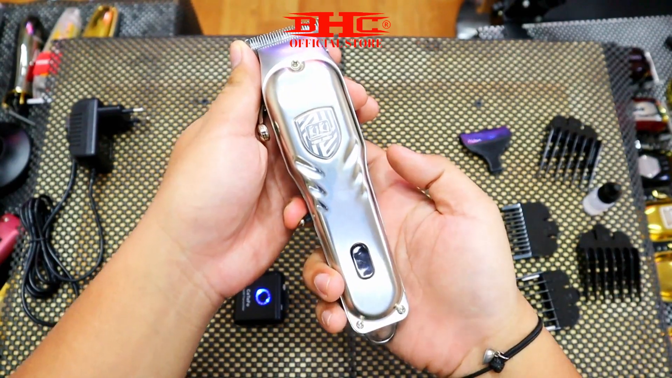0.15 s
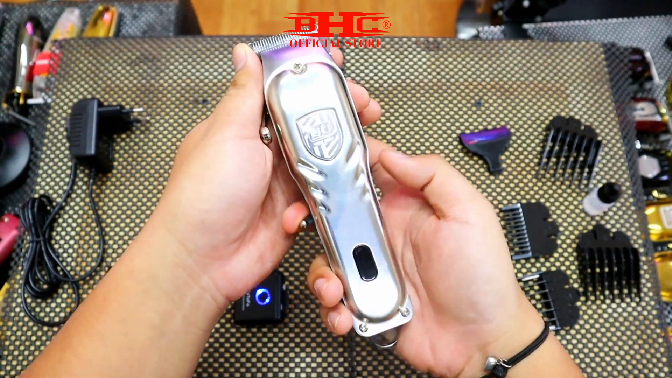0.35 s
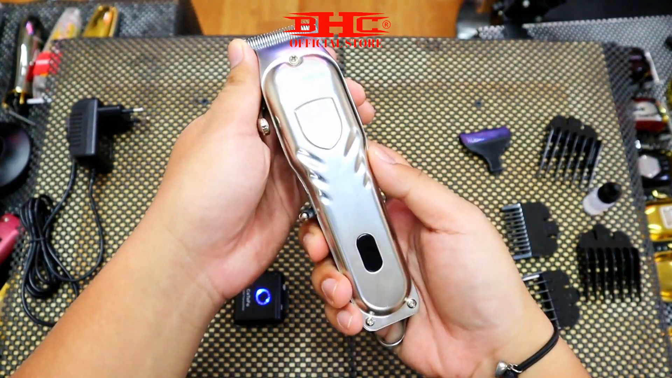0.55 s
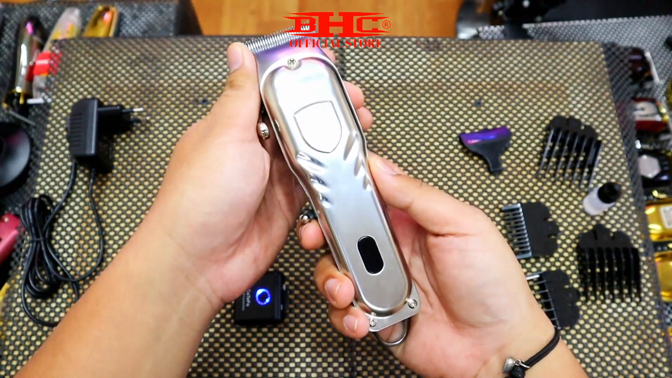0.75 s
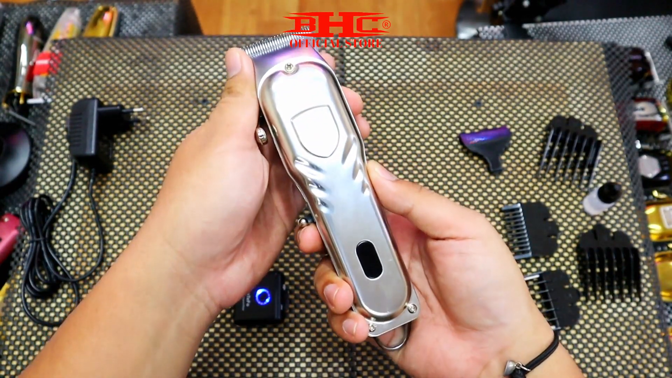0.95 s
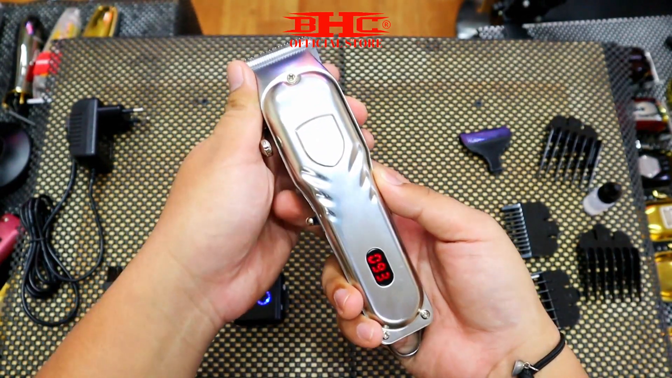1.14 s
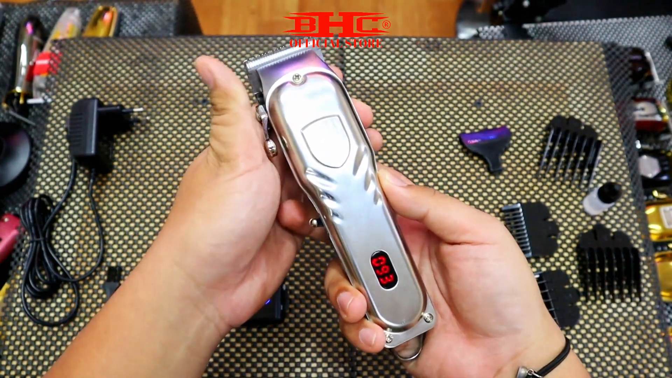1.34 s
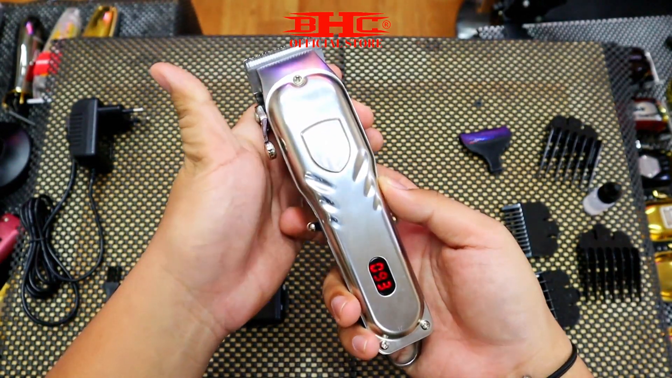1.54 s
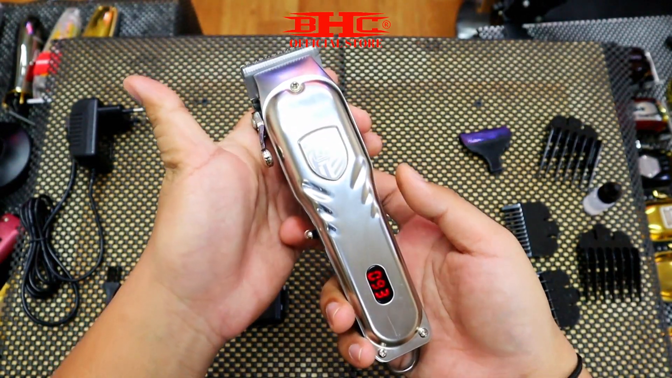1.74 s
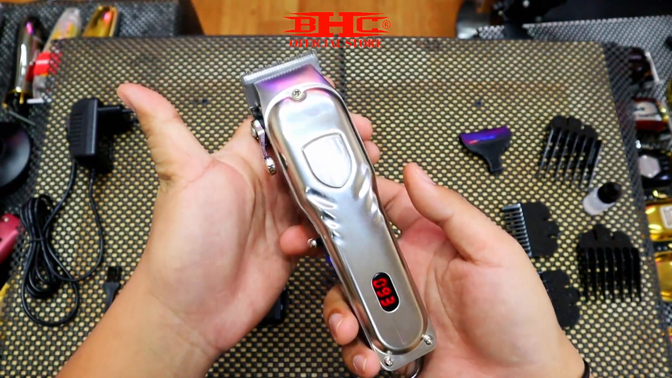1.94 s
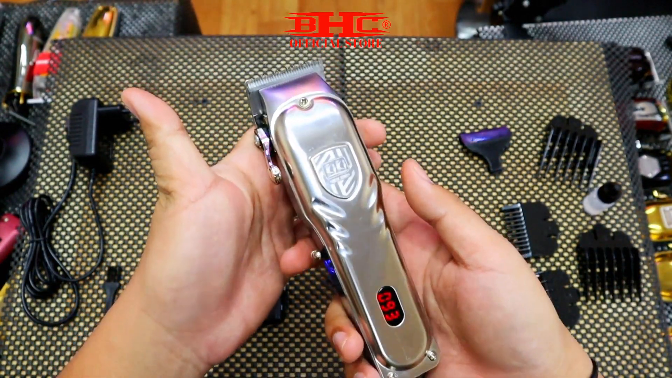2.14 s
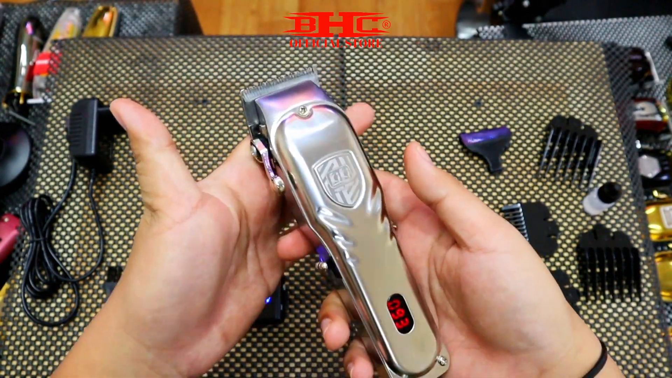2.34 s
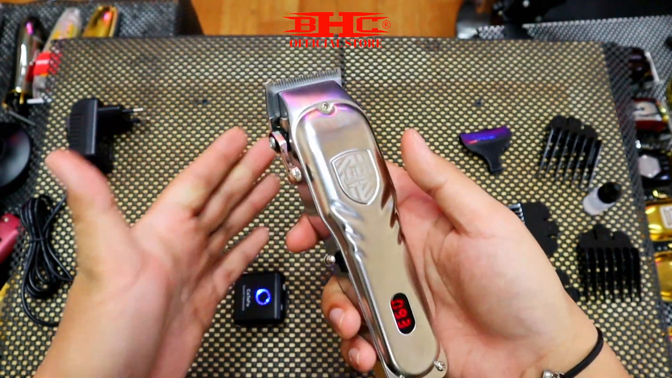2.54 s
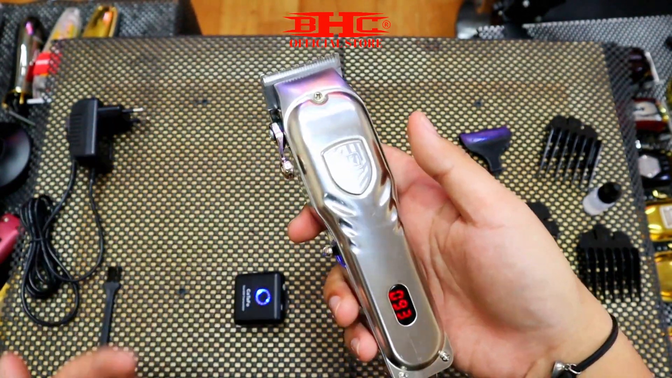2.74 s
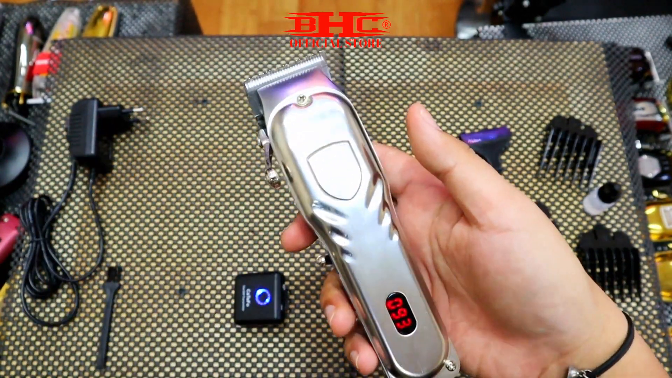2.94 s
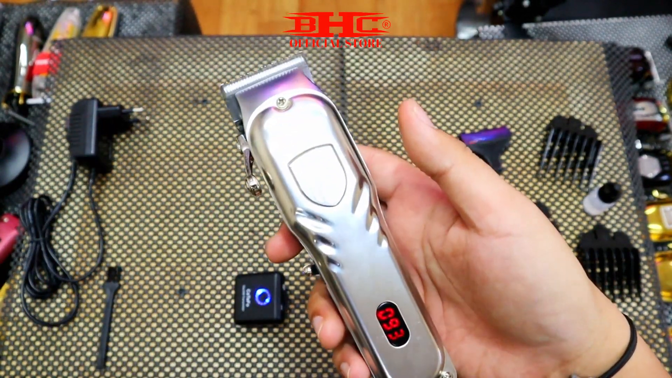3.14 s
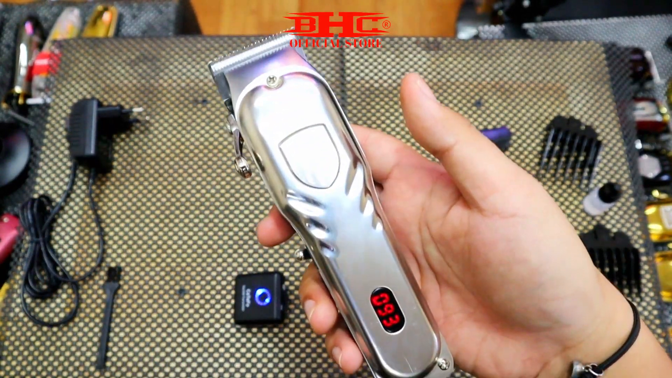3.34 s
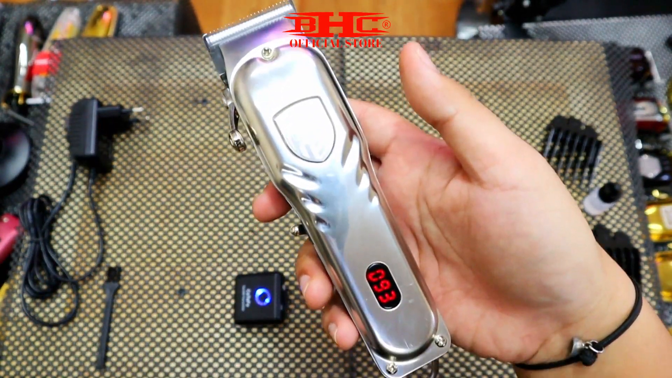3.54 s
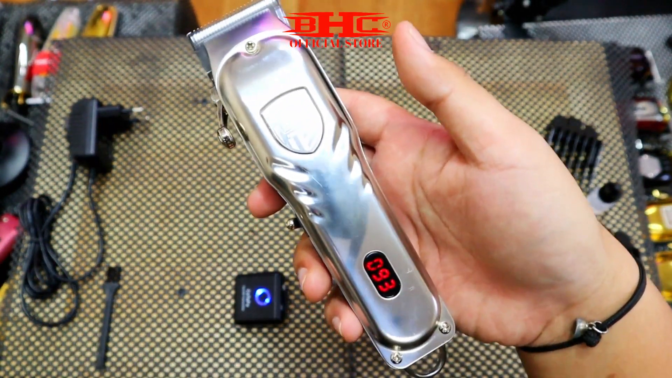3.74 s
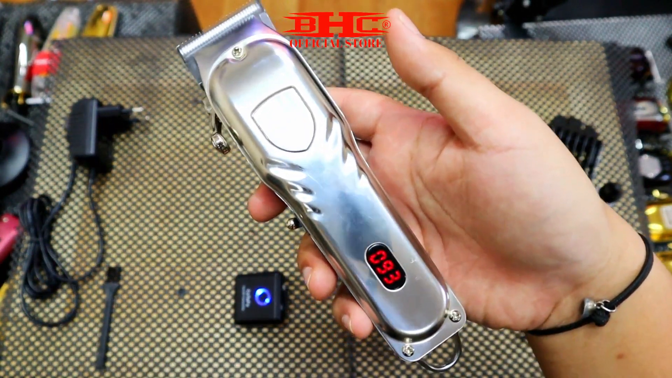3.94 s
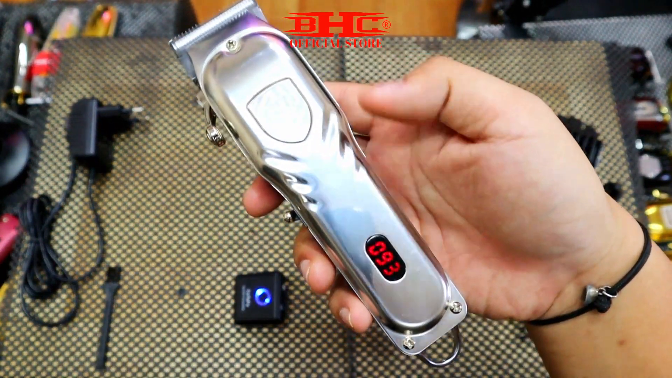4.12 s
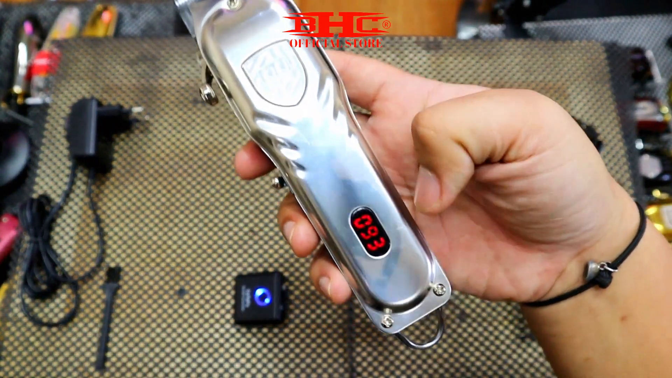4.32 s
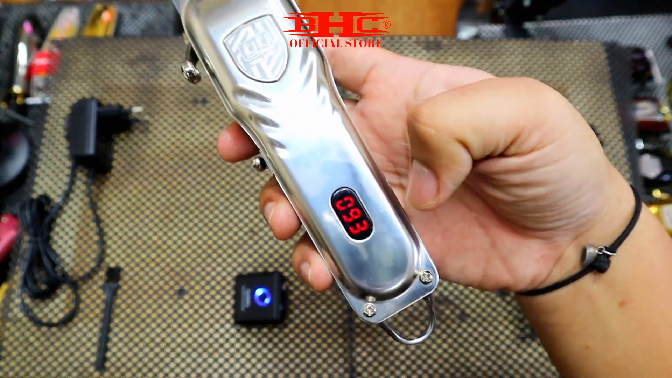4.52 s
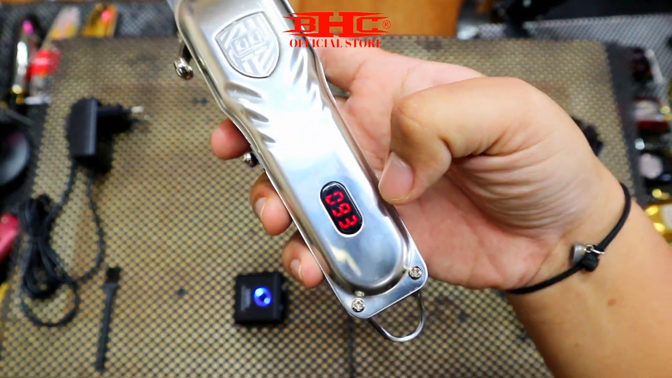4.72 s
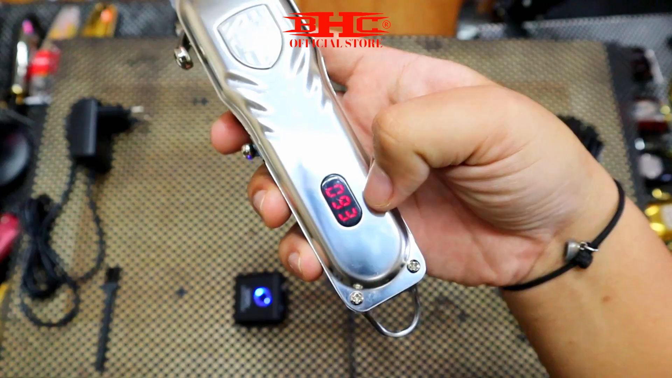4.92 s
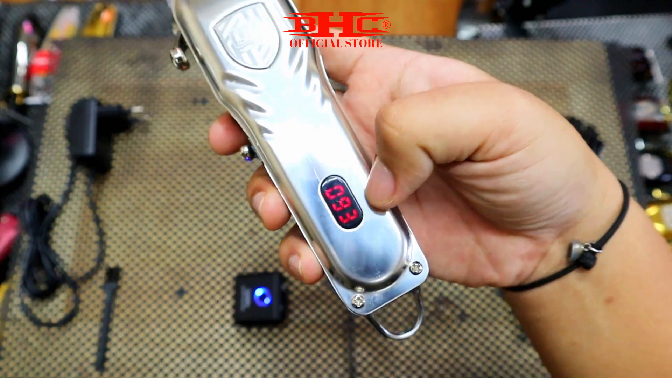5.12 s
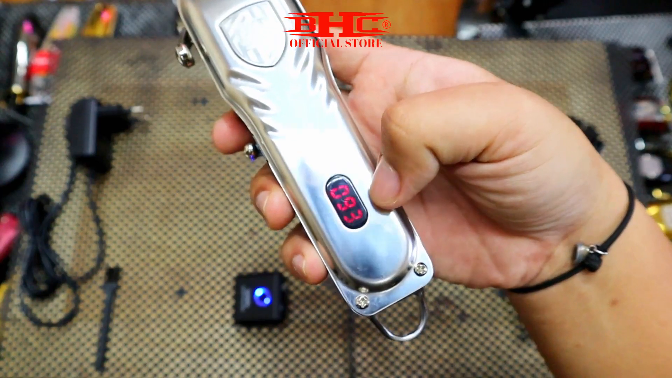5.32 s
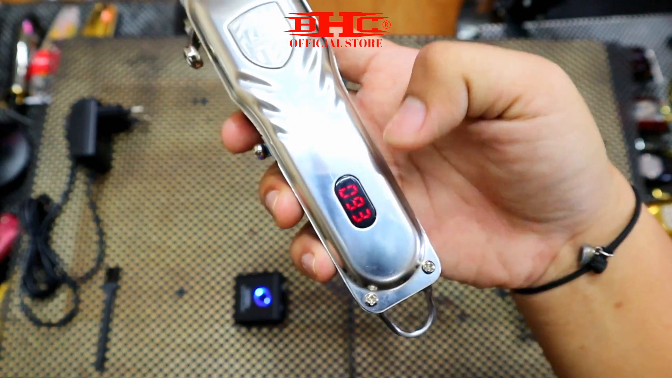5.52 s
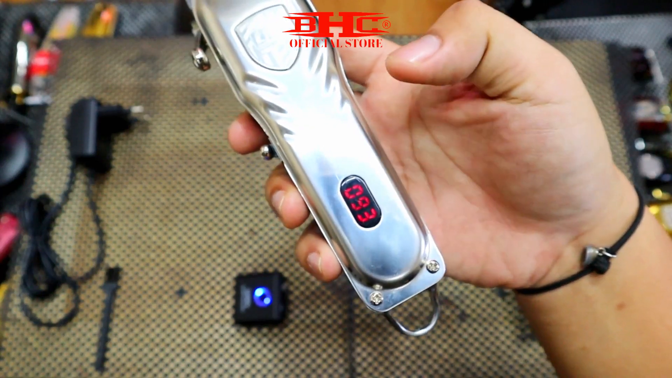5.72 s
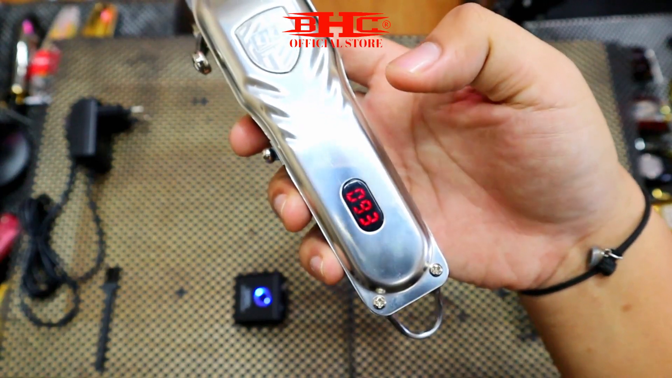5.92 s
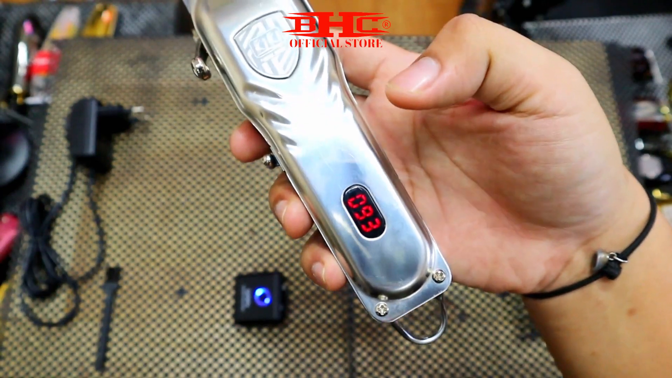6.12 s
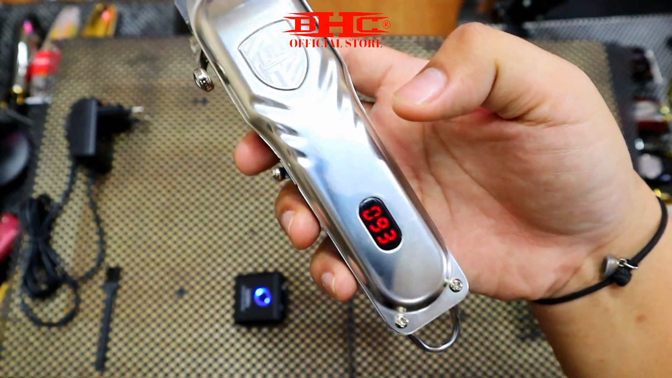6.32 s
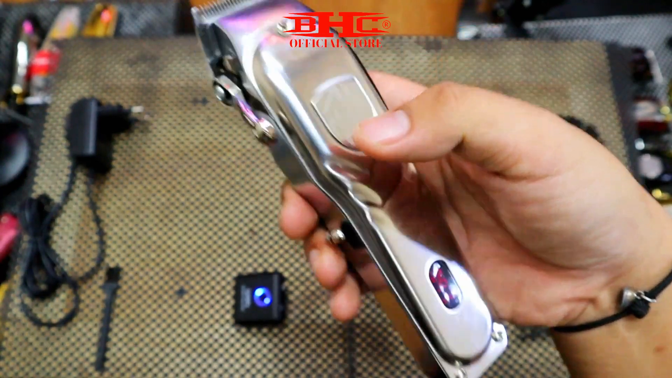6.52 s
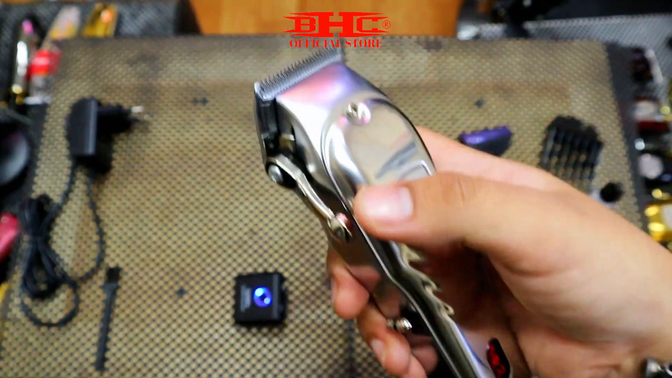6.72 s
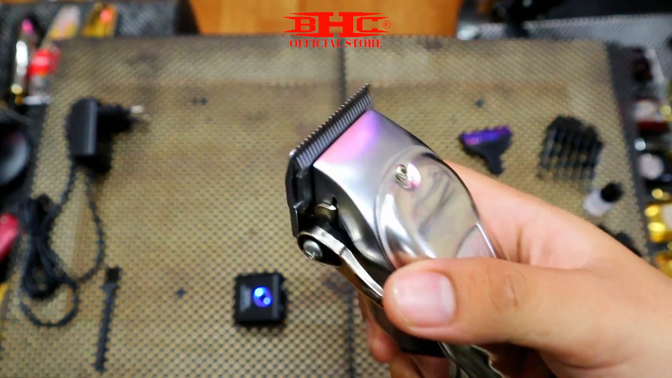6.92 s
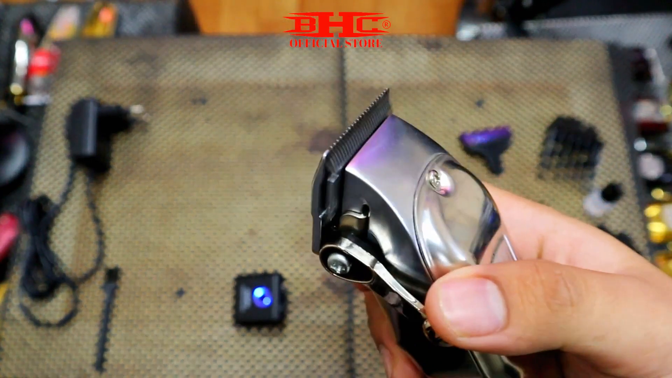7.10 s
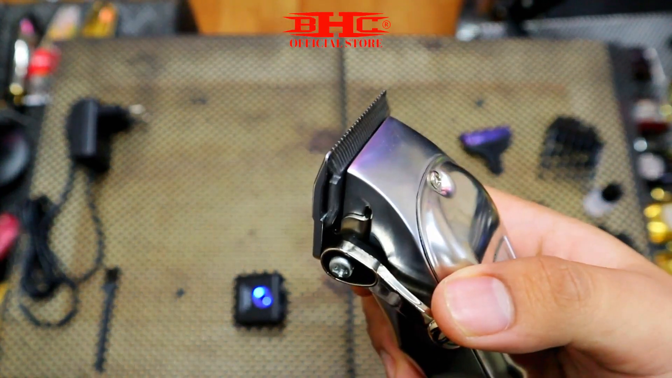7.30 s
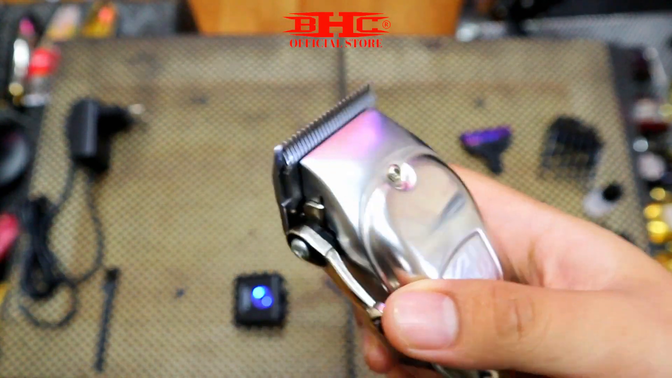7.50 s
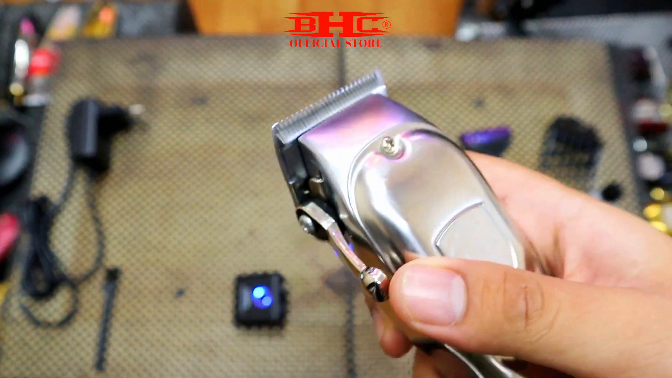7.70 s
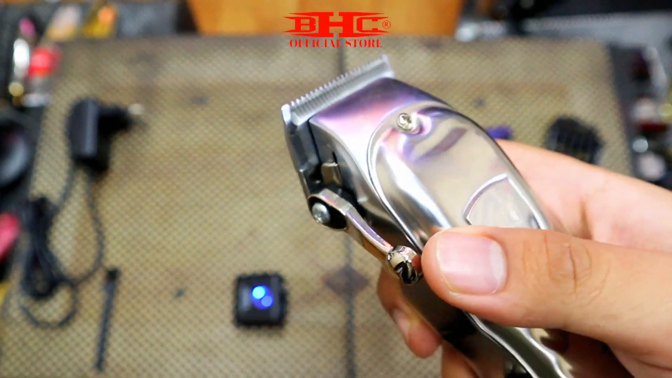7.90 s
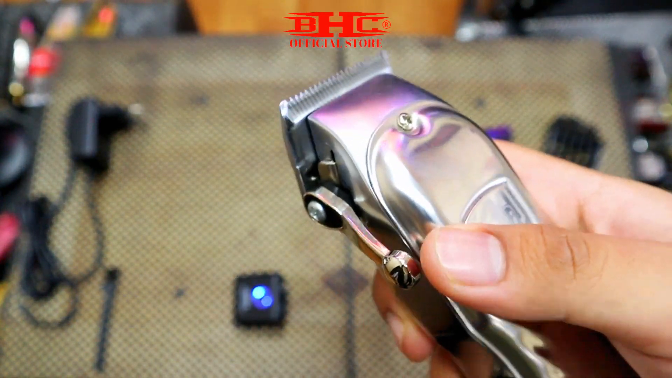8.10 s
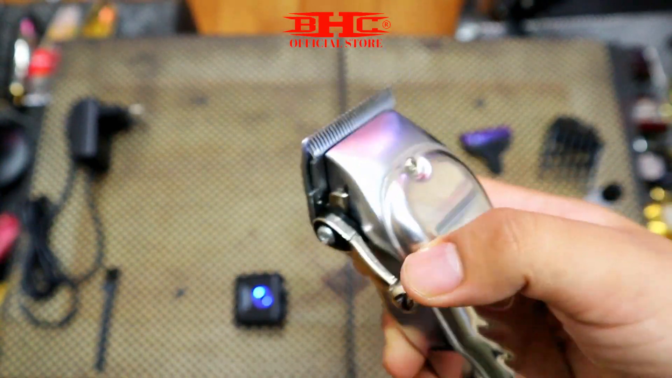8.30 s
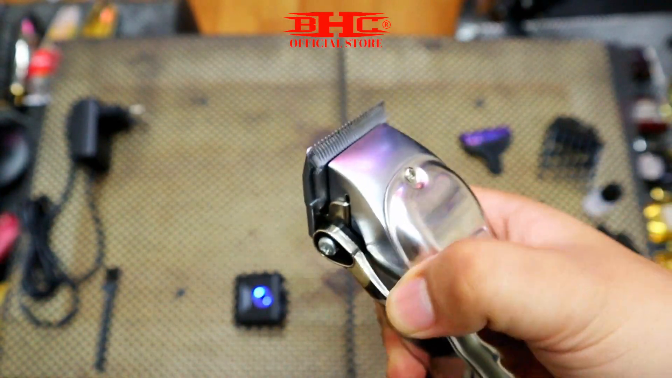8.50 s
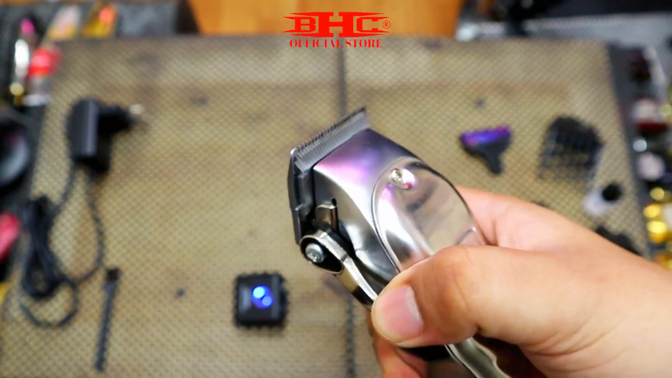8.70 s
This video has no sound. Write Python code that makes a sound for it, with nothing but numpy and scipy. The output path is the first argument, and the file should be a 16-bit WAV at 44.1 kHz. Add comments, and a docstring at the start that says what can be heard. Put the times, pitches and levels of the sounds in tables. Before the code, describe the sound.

A loud sharp switch snap, then a small metal clipper motor spins up and buzzes steadily close by, over faint traffic rumble.

```python
"""Hair clipper turned in the hand

A metal hair clipper is held close to a microphone above a bench, switched on and turned in the hand.
Each motor turn knocks the blade out and back; the knocks ring shell and blades, and each way of holding
it aims other modes at the microphone. Filtered noise and gliding tones make traffic outside a small room;
dull thuds are low modes struck once, and near the end a lever rattles and snaps as struck spring modes."""
import sys
import numpy as np
from scipy import signal
from scipy.fft import rfft, irfft
from scipy.io import wavfile
from scipy.ndimage import uniform_filter1d, map_coordinates

SR = 44100
rng = np.random.default_rng(int(sys.argv[2]) if len(sys.argv) > 2 else 0)


def transcribe(signal):
    """Save signal, clipped to [-1, 1], as a 16-bit WAV file at the path in sys.argv[1]."""
    frames = np.atleast_2d(signal).T
    limited = np.clip(frames, -1, 1)
    pcm = np.round(limited * 32767).astype(np.int16)
    wavfile.write(sys.argv[1], SR, pcm)


N = 385875
STEP = 64  # samples between updates of slow controls

# how it is held: (t/s, hold: 0 upright, 1 laid back, 2 raised, 3 blade forward, 4 rolled over, 5 thumb on lever)
HOLD_PATH = [(2.2, 0.), (2.65, 1.), (4.2, 1.), (4.55, 2.), (6.55, 2.), (6.8, 3.), (7.66, 3.), (7.8, 4.),
             (8.22, 4.), (8.32, 5.)]
# knocks in one turn: (share of the turn, relative level/dB into belly, grip, head, low and high blade modes)
TURN_KNOCKS = [(.17, -14, -4, -22, -9, 0), (.27, 0, 0, 0, 0, -8), (.48, -12, -8, -4, -10, -20),
               (.65, -14, -5, -20, -8, -9), (.77, -14, -9, -16, -7, -9), (.9, -1, -3, -24, -12, -16)]
# the loaded lever rattles on the shell: (t/s, level/dB)
LEVER_RATTLES = [(8.590, -37), (8.6025, -34), (8.6155, -32), (8.628, -31), (8.6432, -28)]
# running speed of the motor: (t/s, f/Hz in turns per second)
RUNNING_SPEED = [(3.0, 78.32), (4.2, 78.41), (5.5, 78.2), (7.5, 78.09), (8.75, 78.14)]


def undb(db):
    """Amplitude ratio of a level: 20 dB per factor of ten."""
    return 10 ** (np.asarray(db) / 20)


def unit(x):
    """Normalisation to a root-mean-square of one."""
    return x / np.sqrt(np.mean(x ** 2))


def curve(rows):
    """Linear interpolation: the columns of a (t/s, ..) table at every sample."""
    s, *columns = np.transpose(rows)
    return [np.interp(np.arange(N) / SR, s, c) for c in columns]


def walk(rate):
    """Smoothed random control: levels held 1 / rate s and slewed twice, with a spread near 0.8."""
    k = int(SR / rate)
    steps = np.repeat(rng.standard_normal(N // k + 1), k)
    return 1.09 * uniform_filter1d(uniform_filter1d(steps, k), k)[:N]


def clicks(seconds, sizes):
    """Band-limited impulses: windowed sinc pulses placed between samples."""
    at = np.asarray(seconds) * SR
    near = np.floor(at).astype(int)[:, None] + np.arange(-8, 9)
    off = near - at[:, None]
    pulses = np.sinc(off) * np.cos(np.pi * off / 18) ** 2
    out = np.zeros(N + 16)
    np.add.at(out, near, np.asarray(sizes)[:, None] * pulses)
    return out[:N]


def ring(x, hz, width_hz, order=1):
    """Damped resonance of one mode; a higher order has steeper skirts and a softer start."""
    r = np.exp(-np.pi * width_hz / SR)
    section = [0.494, 0.00073, -0.45, 1, -2 * r * np.cos(2 * np.pi * hz / SR), r * r]
    return signal.sosfilt([section] * order, x)


def coloured(points):
    """Spectral shaping: unit-level noise weighted by (f/Hz, level/dB) points."""
    hz, db = np.transpose(points)
    f = np.maximum(np.fft.rfftfreq(N, 1 / SR), 1)
    weight = undb(np.interp(np.log(f), np.log(hz), db))
    return unit(irfft(rfft(rng.standard_normal(N)) * weight, N))


def by_hold(values):
    """Interpolation between orientations: one value per hold, followed as the hand turns."""
    return np.interp(np.clip(curve(HOLD_PATH)[0], 0, 5), np.arange(6), values)


def fine(slow):
    """Zero-order hold: a slow control at every sample."""
    return np.repeat(slow, STEP, axis=-1)[..., :N]


def street():
    """Superposed distant engines: broad rumble, a hum and gliding, wavering tones with a weak octave."""
    # rumble spectrum: (f/Hz, relative level/dB per Hz)
    rumble_spectrum = [(15, -31), (28, -7), (60, -6), (130, -9), (170, -11), (300, -14.5), (470, -18.5),
                       (860, -19), (1400, -27), (3000, -37.5)]
    # rumble level, around which it wanders: (t/s, level/dB)
    rumble_level = [(0, -50.5), (1.5, -52), (3, -50), (4.5, -50), (6, -50), (7, -51), (8.75, -50)]
    # engine drones: (t/s, length/s, first f/Hz, last f/Hz, level/dB before fade and throb)
    drones = [(0, 1.2, 120.4, 115.5, -53), (.3, 0.71, 137.1, 131.7, -55), (.2, 0.7, 74.8, 67, -54),
              (2.3, 0.73, 128.8, 128, -61), (3.0, 1.77, 91.55, 96.34, -50.5),
              (3.2, 0.52, 124, 120.8, -55.5), (4.3, 0.57, 116.8, 120.2, -53.5),
              (4.7, 0.98, 106.4, 101.1, -48.5), (4.7, 1.64, 79.6, 73.1, -50),
              (5.6, 0.46, 121.7, 123.8, -51.5), (6.05, 0.4, 125.8, 136.3, -49),
              (6.35, 2.2, 113, 125.3, -47.5), (6.5, 1.2, 57.7, 61.8, -50), (6.65, 0.65, 93, 92, -55),
              (3.3, .7, 150.6, 155.4, -59), (4.7, 2, 178.4, 179.7, -58), (6.4, 0.61, 142, 151.7, -56),
              (8.0, 0.58, 61, 63.4, -59)]
    rise_share, fall_db = 0.17, 4.5  # share of the length to swell or die; fade over the whole length
    bend = .5  # the glide eases by this power
    hum_hz, hum_db = 100, -56.5

    out = coloured(rumble_spectrum) * undb(curve(rumble_level)[0] + 1.3 * walk(2.09))
    waver, throb_db = 1 + 0.00726 * walk(6), 2.8 * walk(9)
    hum_gain = np.sqrt(2) * undb(hum_db + 0.68 * walk(3.8))
    hum_phase = 2 * np.pi * np.cumsum(hum_hz * (1 + 0.0072 * walk(3.17))) / SR
    out += hum_gain * np.sin(hum_phase)
    for row, (s, length, first_hz, last_hz, db) in enumerate(drones):
        at = np.arange(int(s * SR), min(int((s + length) * SR), N))
        gone = np.clip((at / SR - s) / length, 0, 1)
        own = (at + row * N // len(drones)) % N  # each drone reads its own stretch of waver and throb
        edge = np.clip(np.minimum(gone, 1 - gone) / rise_share, 0, 1)
        swell = np.sin(np.pi / 2 * edge) * undb(-fall_db * gone)
        pitch_hz = (first_hz + (last_hz - first_hz) * gone ** bend) * waver[own]
        phase = 2 * np.pi * np.cumsum(pitch_hz) / SR
        tone = np.sin(phase) + undb(-15.0) * np.sin(2 * phase)
        out[at] += swell * np.sqrt(2) * undb(db + throb_db[own]) * tone
    return out


def snaps():
    """Impulsive excitation: spring parts creak, hit twice and rebound; a rattle softly knocks the shell."""
    # switch and lever: (t/s, level/dB, treble tilt/dB per octave, rebound delay/s, rebound level/dB, crack level/dB)
    snap_events = [(1.1386, -5, 4, 0.001825, -5.5, -10), (8.6423, -26.5, 10, 0.001193, 3, -28)]
    # modes of the snapping parts: (f/Hz, width/Hz, relative level/dB before the tilt)
    snap_modes = [(1640, 130, 6), (2090, 180, 9), (2820, 1130, -1), (3640, 440, -7), (4870, 220, -4.5),
                  (5300, 230, 0), (5800, 320, -4.5), (7700, 610, -6), (8650, 620, -21), (9560, 840, -8),
                  (10900, 700, -17), (11200, 680, -22), (12700, 900, -25), (15600, 1500, -22)]
    crack_t60_s, crack_hz, crack_width_hz = 0.0098, 9760, 4800  # broad crack of a snap

    out = np.zeros(N)
    after = np.arange(int(.02 * SR))
    for s, db, tilt_db, rebound_s, rebound_db, crack_db in snap_events:
        # a faint creak, then the hits
        blow = clicks([s - .001, s, s + .00037, s + .0009], undb([-21, -2, 0, -6]) * [1, 1, -1, 1])
        rebound = clicks([s + rebound_s], [undb(rebound_db)])
        crack = unit(ring(rng.standard_normal(len(after)), crack_hz, crack_width_hz, order=2))
        out[int(s * SR) + after] += undb(crack_db - 60 * after / SR / crack_t60_s) * crack
        for hz, width_hz, mode_db in snap_modes:
            octaves = np.log2(hz / 3000)
            hit = blow + undb(-5 * octaves) * rebound  # the rebound is duller
            mode_gain = undb(db + mode_db + tilt_db * octaves) * width_hz / 1000
            out += mode_gain * ring(hit, hz, width_hz)
    s, db = np.transpose(LEVER_RATTLES)
    knock = ring(clicks([.01], [1]), 1090, 1350, order=2)  # sets the scale of the rattle
    rattle = -ring(clicks(s, undb(db)), 1140, 990, order=2) / np.max(np.abs(knock))
    s, db = np.transpose(snap_events)[:2]
    thump = ring(clicks(s, undb(db - 13)), 1110, 480)  # the shell gives under the thumb
    low_cut = signal.butter(3, 1150, "high", fs=SR, output="sos")
    return signal.sosfilt(low_cut, out) + rattle + thump


def room(x):
    """Reverberation by convolution: walls answer after a short gap; the treble dies first."""
    # first echoes: (t/s, level/dB against a tail of unit energy)
    wall_echoes = [(0.0145, -15), (.021, -12)]
    t60_s, onset_s = 0.43, 0.007  # the tail enters at 0.6 of the onset time and is full at 1.6

    t = np.arange(int(.6 * SR)) / SR
    low = unit(ring(rng.standard_normal(len(t)), 3000, 1960))
    high = unit(ring(rng.standard_normal(len(t)), 9500, 17000))
    tail = low * undb(-60 * t / t60_s) + undb(-1.0) * high * undb(-60 * t / (0.24 * t60_s))
    tail = tail * np.clip(t / onset_s - .6, 0, 1)
    tail /= np.sqrt(np.sum(tail ** 2))
    for s, db in wall_echoes:
        tail[int(s * SR) + np.arange(5)] += undb(db) * np.hanning(5)
    return signal.fftconvolve(x, tail)[:N]


def clipper():
    """Periodic excitation: one motor drives shell and blades, louder with speed and nearness."""
    # the motor starts short of its running speed and catches up: (shortfall/Hz, time constant/s)
    shortfalls = [(52, .062), (1.7, .55)]
    # level of the whole clipper at full speed, as the hand carries it nearer and further: (t/s, level/dB)
    nearness = [(1.3, -44.5), (1.33, -47), (2.25, -46), (2.39, -47.5), (2.53, -46), (3.1, -46),
                (3.5, -47.5), (4.2, -48), (4.8, -50.5), (6.45, -50), (6.8, -49.5), (7.45, -49.5),
                (8.15, -51.5), (8.56, -49)]
    # head and blades against the grip: (level/dB in hold 0, 1, 2, 3, 4, 5)
    head_db = [-2.1, -2.5, -2.1, -0.5, 0, -2.2]
    blade_db = [-8.5, -8, -6, -8, -4, -6.5]
    # the head swells or dips briefly: (t/s, rise/dB, length/s)
    head_swells = [(2.506, 1.5, .15), (6.79, 2, 0.35), (7.714, 2, 0.16), (8.002, 1.5, 0.13),
                   (8.34, 3, 0.12), (8.72, -3, 0.17)]
    # the blades clatter harder as they come up to speed: (t/s, rise/dB, length/s)
    start_s, start_rise_db, start_length_s = (1.35, 2.7, .09)
    switch_on_s = 1.14
    spin_up_db = 82  # dB gained per tenfold speed

    t = np.arange(N) / SR
    running = t > switch_on_s
    since_on = np.maximum(t - switch_on_s, 0)
    speed_hz = curve(RUNNING_SPEED)[0] - sum(hz * np.exp(-since_on / s) for hz, s in shortfalls)
    turns = np.cumsum(speed_hz * running) / SR
    # the lever rattles on the second knock
    turns += (TURN_KNOCKS[1][0] - np.interp(LEVER_RATTLES[0][0], t, turns)) % 1
    # steel slides on steel, hardest twice a turn
    slide = rng.standard_normal(N) * (1 + .5 * np.cos(4 * np.pi * (turns - .25)))
    grip, head = shell(turns, slide)
    swell_db = sum(db * np.exp(-(2 * (t - s) / length) ** 2) for s, db, length in head_swells)
    start_db = start_rise_db * np.exp(-(2 * (t - start_s) / start_length_s) ** 2)
    parts = grip + head * undb(by_hold(head_db) + swell_db)
    parts = parts + blades(turns, slide) * undb(by_hold(blade_db) + start_db)
    speed_db = spin_up_db * np.log10(speed_hz / speed_hz.max())
    return running * parts * undb(curve(nearness)[0] + speed_db)


def shell(turns, slide, rough_db=-19):
    """Fourier series: every turn repeats, so belly, grip and head hum as partials phased by the knocks."""
    # partials of the turn rate: (multiple, relative level/dB)
    partials = [(2, -16.0), (3, -9.0), (4, -10.0), (5, -12.0), (6, -1.5), (7, 1.0), (8, -0.0), (9, 0.5),
                (10, -6.5), (11, -8.5), (12, -2.5), (13, -9.5), (14, -5.0), (15, -7.5), (16, -6.0),
                (17, -7.5), (18, -3.5), (19, -0.5), (20, -1.0), (21, -7.0), (22, -8.5), (23, -8.5),
                (24, -5.0), (25, -6.5), (26, -7.5), (27, -9.0), (28, -3.0), (29, -0.5), (30, -1.0),
                (31, -1.5), (32, 0.5), (33, -1.0), (34, -3.0), (35, -4.5), (36, -5.5), (37, -7.5),
                (38, -9.0), (39, -8.5), (40, -13.5), (41, -11.5), (42, -14.5), (43, -12.0), (44, -18.0)]
    # what each hold lifts or shades: (f/Hz, level/dB in hold 0, 1, 2, 3, 4, 5)
    hold_shades = [(391, -0.0, 0.0, 0.0, -0.0, -0.0, -0.0), (547, -1.5, -0.5, 1.0, 0.5, -0.5, 1.0),
                   (703, 2.0, 1.5, 1.0, -1.5, 2.5, -3.0), (860, 3.5, 0.0, -2.5, 1.5, -3.5, 0.5),
                   (938, 1.0, 3.5, 3.5, -1.5, -6.5, 0.5), (1016, -4.0, -2.5, -1.0, 3.0, 1.5, 3.0),
                   (1094, -3.0, 5.0, -3.0, -4.0, 1.0, -2.0), (1250, -6.0, -8.5, -0.0, 5.0, 5.0, 4.5),
                   (1328, 2.5, 5.0, -2.0, -3.5, -1.5, -1.0), (1407, 5.5, 2.5, 4.5, 1.0, -6.0, -2.0),
                   (1485, -2.5, -4.0, -4.5, 4.0, 3.0, 4.0), (1563, 3.5, 2.0, -1.5, 1.0, -4.0, -0.5),
                   (1641, 0.0, -4.5, -3.0, 2.5, 2.0, 2.5), (1797, 1.0, 1.0, 6.5, -2.0, -7.0, 0.5),
                   (1875, -2.0, 1.5, 1.0, -2.0, -3.5, -1.5), (1954, 5.0, -1.0, -5.5, -1.0, 0.0, 2.5),
                   (2110, 0.0, 2.0, -5.0, -0.5, 1.5, 2.0), (2188, 0.5, 3.5, -4.5, 3.5, -6.0, 3.5),
                   (2266, -1.5, 0.5, 3.0, -3.5, 2.0, -0.5), (2344, 4.5, 2.5, 7.0, -4.0, -10.0, -0.0),
                   (2422, -2.0, -7.5, -1.0, 5.0, 3.0, 2.5), (2500, 1.0, 1.0, -1.0, 2.5, -6.0, 3.0),
                   (2579, -6.5, 4.0, -1.0, -0.5, 2.5, 1.0), (2657, 3.0, 1.5, -1.0, 0.5, 3.0, -6.5),
                   (2735, -7.0, 0.5, -3.0, 2.5, 5.5, 1.5), (2891, 2.5, -0.5, -2.0, -0.5, 1.5, -1.0),
                   (3047, 4.5, -1.5, -2.5, 0.5, 1.5, -2.5), (3204, -3.5, -4.5, 1.5, 6.5, 4.0, -4.5),
                   (3438, -4.0, 2.0, -2.0, -4.0, 2.5, 5.0)]
    # lowest multiples that come from the grip and from the head
    part_from = [13, 23]
    # how belly, grip and head ring on after a knock: (f/Hz, width/Hz)
    part_modes = [(900, 450), (900, 510), (2400, 350)]
    # for belly, grip and head, how much more one knock arrives: (knock counted from 0, level/dB in hold 0, 1, 2, 3, 4, 5)
    swing = [(1, 0, 1, 0, -12, -12, -6), (1, 0, 0, 0, 0, 0, 0), (2, -1, -5, 7, 2, -5, 4)]

    share, *knock_db = np.transpose(TURN_KNOCKS)
    hold = np.clip(curve(HOLD_PATH)[0][::STEP], 0, 5)
    turn_hz = RUNNING_SPEED[-1][1]
    shade_hz, *shade_db = np.transpose(hold_shades)
    sound, power = np.zeros((2, N)), np.zeros((2, len(hold)))  # rows: belly with grip, head
    for k, db in partials:
        k = round(k)
        hz = k * turn_hz
        part = np.searchsorted(part_from, k, side="right")
        knocks = undb(knock_db[part]) * np.exp(-2j * np.pi * k * share)
        swung, *swing_db = swing[part]
        total = knocks.sum() + (undb(swing_db) - 1) * knocks[swung]
        mode_hz, width_hz = part_modes[part]
        # phase of the knocks plus that of the resonance they drive
        lag = np.unwrap(np.angle(total)) - np.arctan((hz - mode_hz) / (width_hz / 2))
        line = np.sqrt(2) * np.cos(2 * np.pi * k * turns + fine(np.interp(hold, np.arange(6), lag)))
        rough = undb(rough_db) * unit(ring(slide, hz, turn_hz))
        gain = aim([db + np.interp(hz, shade_hz, shade) for shade in shade_db])
        row = part // 2
        sound[row] += fine(gain * glint(hz)) * (line + rough)
        power[row] += gain ** 2
    return sound / fine(np.sqrt(power))


def aim(hold_db, still_db=2.4, turning_db=1.87):
    """Directivity: slow gain of one partial, set by the hold and wandering most while the hand turns."""
    coarse = np.arange(0, N, STEP) / SR
    hold = np.clip(np.interp(coarse, *np.transpose(HOLD_PATH)), 0, 5)
    turning = np.sqrt(np.abs(uniform_filter1d(np.gradient(hold, coarse), 240)))
    slow, quick = (np.interp(coarse, np.linspace(0, N / SR, n), rng.standard_normal(n)) for n in (24, 80))
    return undb(np.interp(hold, np.arange(6), hold_db) + still_db * slow + turning_db * turning * quick)


def glint(hz):
    """Directivity: a band flashes toward the microphone or away as the hand tilts."""
    # flashes: (t/s, f/Hz, width/Hz, level/dB, length/s)
    flashes = [(1.35, 7450, 600, 7, .14), (2.17, 9300, 600, 5, 0.2), (2.3, 10100, 800, -4, 0.3),
               (2.7, 7500, 600, 3.5, .12), (2.68, 7100, 500, 4, 0.16), (2.44, 11000, 600, -12, 0.38),
               (2.2, 6800, 500, 2, 0.68), (2.73, 3400, 500, -19, 0.37), (8.35, 2320, 430, 5.5, 0.22),
               (8.05, 2580, 300, 5, 0.37), (8.0, 2660, 160, -12, 0.58), (7.72, 2500, 280, 2.5, 0.12),
               (6.85, 3200, 250, 8, 0.14), (7.06, 1250, 56, 4.5, 0.58), (8.65, 1850, 520, 4, 0.33),
               (8.6, 400, 100, 16.5, 0.25), (3.77, 2395, 130, -23, 0.81), (2.27, 3050, 210, 2, .6),
               (1.9, 3360, 250, -14, .3), (2.7, 3400, 250, 5, .5), (3.8, 4500, 250, -8, .7),
               (5.6, 2840, 170, -9, 1), (4.1, 10300, 700, 3, 1.2), (3.9, 5100, 700, 4.5, 0.99),
               (6.4, 7500, 750, 4.5, 1.3), (4.6, 7400, 700, -6, .6), (7.9, 9400, 600, 4, 0.68),
               (1.24, 1370, 730, -6, .15)]
    coarse = np.arange(0, N, STEP) / SR
    total_db = 0
    for s, at_hz, width_hz, db, length in flashes:
        off_pitch, off_time = 2 * (hz - at_hz) / width_hz, 2 * (coarse - s) / length
        total_db = total_db + db * np.exp(-off_pitch ** 2 - off_time ** 2)
    return undb(total_db)


def blades(turns, slide, jitter_s=3e-6, scatter_db=.7, rough_db=-18):
    """Modal excitation: sharp knocks, grating teeth and sliding noise ring the blade modes."""
    # modes: (f/Hz, width/Hz, relative level/dB in hold 0, 1, 2, 3, 4, 5)
    blade_modes = [(3710, 500, -15.0, -16.5, -17.5, -12.5, -13.0, -16.5),
                   (4250, 500, -17.5, -14.0, -10.5, -14.5, -24.0, -18.0),
                   (4800, 500, -13.0, -9.5, -14.0, -11.0, -13.5, -14.0),
                   (5350, 500, -13.5, -9.5, -10.5, -15.5, -15.5, -16.5),
                   (6000, 500, -11.5, -12.0, -15.5, -10.0, -11.5, -14.0),
                   (6780, 500, -12.0, -10.0, -10.5, -10.0, -10.0, -11.5),
                   (7450, 500, -11.0, -8.5, -7.0, -6.0, -5.0, -5.0),
                   (7950, 500, -22.5, -13.5, -9.5, -10.5, -9.0, -9.0),
                   (8600, 700, -8.0, -10.5, -12.0, -11.5, -15.0, -10.0),
                   (9300, 650, -10.5, -15.0, -19.0, -12.5, -11.0, -12.5),
                   (10100, 500, -5.0, -8.5, -7.0, -13.5, -11.5, -11.5),
                   (10800, 500, -16.0, -18.5, -19.0, -16.0, -16.0, -16.5),
                   (11500, 500, -20.5, -18.0, -19.0, -14.0, -22.5, -13.5),
                   (12100, 600, -18.0, -19.0, -19.0, -18.5, -17.0, -17.0),
                   (13000, 900, -23.5, -22.0, -22.5, -17.5, -20.5, -18.0),
                   (14400, 1600, -22.5, -16.5, -19.5, -21.5, -21.5, -19.5)]
    high_blade_hz = 6500  # modes above this answer mostly the first knocks, those below the second
    knock_shift = .006  # typical share of a turn by which each hold moves a knock at the microphone
    teeth_db = -3  # the teeth grate alike on every turn

    turn_hz = RUNNING_SPEED[-1][1]
    whole, low, high = np.arange(1, turns[-1] - .3), 0, 0
    for share, *_, low_db, high_db in TURN_KNOCKS:
        chance = rng.standard_normal((len(whole), 2)).T
        when = np.interp(whole + share, turns, np.arange(N) / SR, right=N / SR - .001)
        when = when + jitter_s * chance[0]
        # the hand is never still
        shift = knock_shift * (by_hold(rng.standard_normal(6)) + .4 * walk(1.2))
        when += shift[(when * SR).astype(int)] / turn_hz
        blow = clicks(when, undb(scatter_db * chance[1]))
        low, high = low + undb(low_db) * blow, high + undb(high_db) * blow
    # other teeth face the microphone in each hold
    count = int(SR / turn_hz)
    facing = by_hold(np.arange(6)) + 0.45 * walk(1.3)
    pattern = rng.standard_normal((7, count))
    teeth = map_coordinates(pattern, [facing, turns % 1 * count], mode="grid-wrap")
    teeth = teeth * (1 + 0.5 * np.cos(4 * np.pi * (turns - .22)))
    grating = undb(teeth_db) * teeth + undb(rough_db) * slide
    drives = [grating - unit(blows) for blows in (low, high)]
    sound, power = 0, 0
    for row, (hz, width_hz, *hold_db) in enumerate(blade_modes):
        # neighbouring modes swing in opposite directions
        gain = (-1) ** row * aim(hold_db, still_db=0.55, turning_db=1.5)
        mode = unit(ring(drives[int(hz > high_blade_hz)], hz, width_hz, order=2))
        sound = sound + fine(gain * glint(hz)) * mode
        power = power + gain ** 2
    return sound / fine(np.sqrt(power))


def bumps():
    """Structure-borne sound: low damped thuds through the bench and the microphone stand."""
    # dull bumps: (t/s, peak level/dB, f/Hz, t60/s)
    bench_bumps = [(2.069, -41, 40, 0.09), (5.45, -41, 30, 0.12), (6.85, -48, 48, 0.14),
                   (8.189, -40.5, 37.6, 0.17), (8.32, -43, 56, .2)]
    out = np.zeros(N)
    for s, db, hz, t60 in bench_bumps:
        width_hz = np.log(1000) / np.pi / t60
        thud = ring(clicks([s], [1]), hz, width_hz, order=2)
        out += undb(db) * thud / np.max(np.abs(thud))
    return out


def scene():
    """Superposition: direct sound, faint room, bumps and street, alike in both channels."""
    buzz, snap = clipper(), snaps()
    # the clipper is close, the room faint
    echo = room(undb(-17) * buzz + undb(-12.5) * snap)
    mid = buzz + snap + echo + bumps() + street()
    return np.array([mid, mid])


def record(dry):
    """Noise floor and band limit: transducer hiss alike in both channels, a faint coloured noise opposite in
    the two, and a steep top cut."""
    # spectrum of the opposite noise: (f/Hz, relative level/dB per Hz)
    side_spectrum = [(100, -47), (250, 23), (600, 21), (1000, 7), (2000, -13), (4000, 19.5), (12000, 23)]
    hiss_db, side_db, top_hz = -73.5, -66.5, 15650
    hiss = undb(hiss_db) * rng.standard_normal(N)
    side = undb(side_db) * coloured(side_spectrum) * np.array([[1], [-1]])
    top_cut = signal.ellip(10, .2, 70, top_hz, fs=SR, output="sos")
    return signal.sosfilt(top_cut, np.clip(dry + hiss + side, -1, 1))


dry = scene()
out = record(dry)
transcribe(out)
```